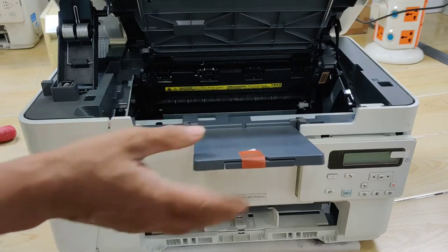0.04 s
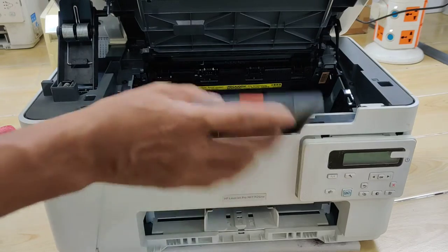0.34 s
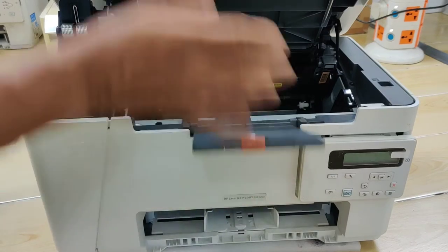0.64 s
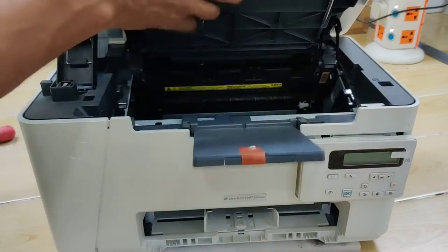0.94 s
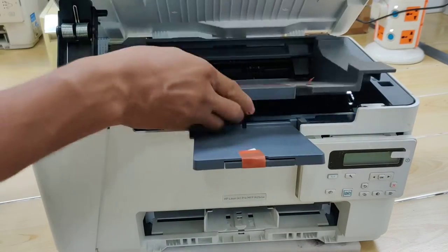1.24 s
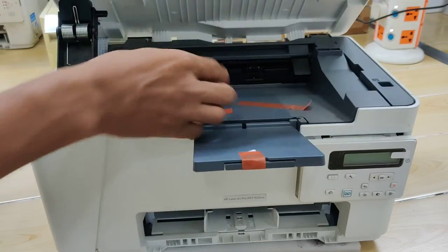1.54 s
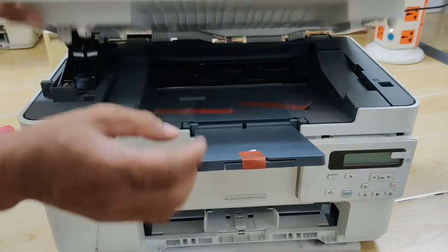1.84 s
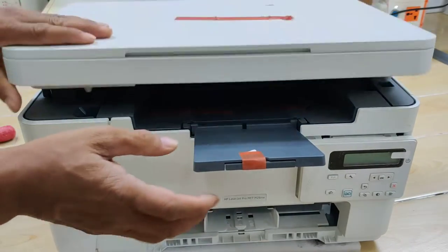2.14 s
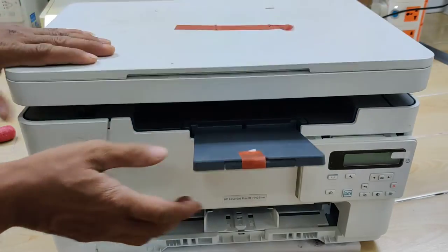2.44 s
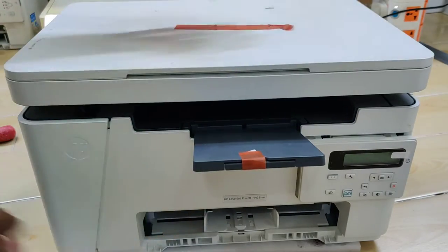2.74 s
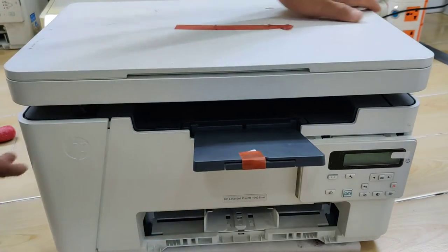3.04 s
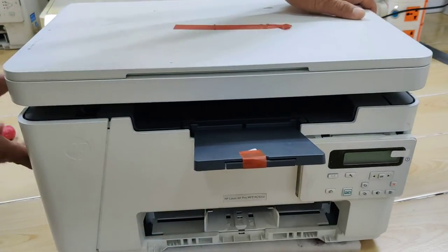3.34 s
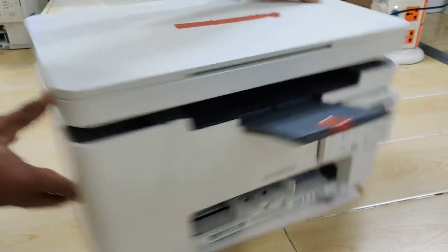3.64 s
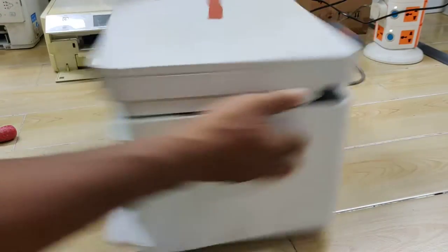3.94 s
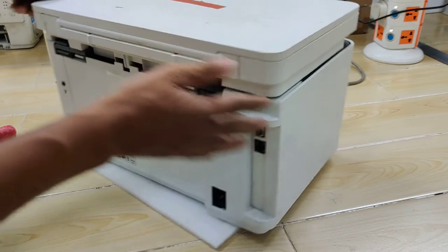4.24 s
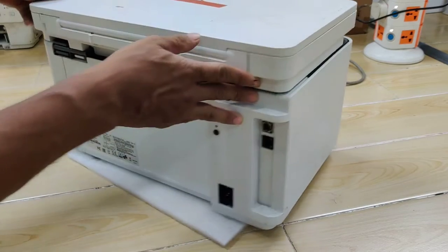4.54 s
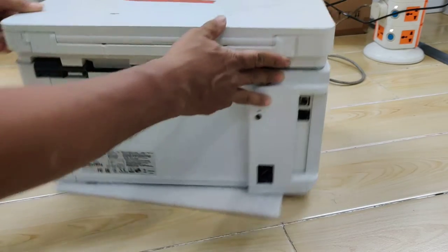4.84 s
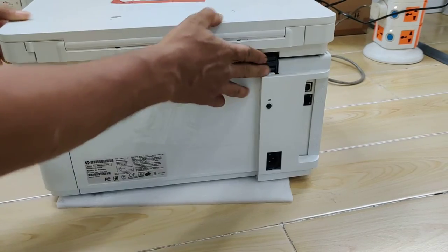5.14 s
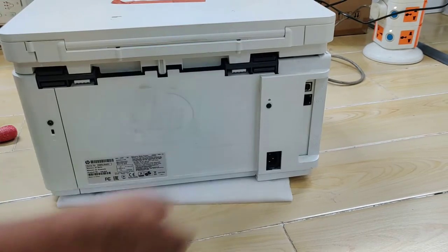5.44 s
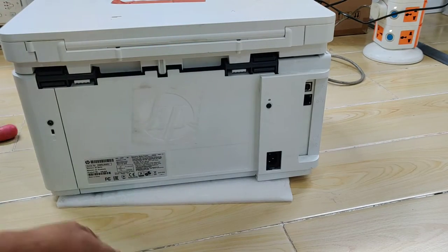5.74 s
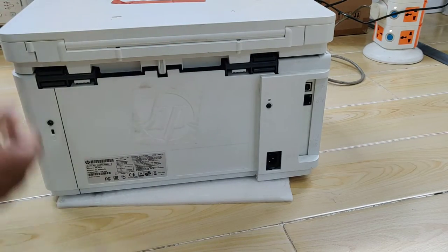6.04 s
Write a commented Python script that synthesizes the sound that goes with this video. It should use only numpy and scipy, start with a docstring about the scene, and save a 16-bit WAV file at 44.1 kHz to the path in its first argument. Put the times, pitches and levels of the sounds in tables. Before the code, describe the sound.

Close by in a small room, a desktop printer's plastic flap ticks and rattles. The inner cover snaps shut with a brief squeak and another sharp clack, and the heavy lid thuds down, ringing the hollow case. After a soft brush of a hand, the printer is dragged round on a foam mat in two rasping pushes, with a knock between them. A low hum runs underneath.

```python
"""Closing and turning a printer

A desktop printer on the floor of a small room, heard from close by. Its plastic flap ticks and rattles,
the inner cover squeaks and snaps shut, and the heavy scanner lid thuds down, ringing the hollow case.
Then it is dragged round on a foam mat in two pushes, with a knock between them, over a low hum.
The speed of each push sets the loudness of the rasp and the pitch of the zip as it brakes."""
import sys
import numpy as np
from scipy import signal
from scipy.fft import rfft, irfft, next_fast_len
from scipy.io import wavfile

SR = 44100
rng = np.random.default_rng(int(sys.argv[2]) if len(sys.argv) > 2 else 0)


def file_out(sig):
    """Save sig as 16-bit WAV at sys.argv[1]."""
    # one column per channel
    cols = np.atleast_2d(sig).T
    # limit, then scale
    lim = np.clip(cols, -1, 1)
    pcm = np.round(lim * 32767).astype(np.int16)
    wavfile.write(sys.argv[1], SR, pcm)


N = 277357
TIME = np.arange(N) / SR


def from_db(db):
    """Decibels to gain."""
    return 10 ** (np.asarray(db) / 20)


def unit_power(x):
    """Scale to an RMS of one."""
    return x / np.sqrt(np.mean(x ** 2) + 1e-20)


def at_hz(curve, hz, column=1):
    """Read a column of a curve on a log-frequency axis."""
    curve = np.array(curve)
    return np.interp(np.log(np.maximum(hz, 1)), np.log(curve[:, 0]), curve[:, column])


def equalise(x, curve):
    """Minimum-phase EQ along a (freq_hz, gain_db) curve: nothing sounds early."""
    size = 2 * next_fast_len(x.shape[-1] // 2 + 2048)
    gain = from_db(at_hz(curve, np.arange(size // 2 + 1) * SR / size))
    cepstrum = irfft(np.log(gain))
    cepstrum[1:size // 2] *= 2
    cepstrum[size // 2 + 1:] = 0
    return irfft(rfft(x, size) * np.exp(rfft(cepstrum)))[..., :x.shape[-1]]


def swell(start_s, end_s, attack_s, release_s):
    """Rounded attack, hold at 1, rounded release."""
    rise, fall = np.clip([(TIME - start_s) / attack_s, (end_s - TIME) / release_s], 0, 1)
    return np.sin(np.pi / 2 * rise) * np.sin(np.pi / 2 * fall)


def drift(rate_hz):
    """Smooth random wander of unit spread."""
    lowpass = signal.butter(2, rate_hz, fs=SR, output="sos")
    return unit_power(signal.sosfilt(lowpass, rng.standard_normal(N)))


def wavering_tone(hz, width_hz):
    """A narrow resonance stirred at random, of unit power."""
    phase = 2 * np.pi * hz * TIME
    return unit_power(drift(width_hz) * np.sin(phase) + drift(width_hz) * np.cos(phase))


def slip_tone(hz, partials, jitter, flutter_db, wander_hz):
    """A train of slips whose rate and strength waver, of about unit power."""
    phase = 2 * np.pi * np.cumsum(hz * (1 + jitter * drift(wander_hz))) / SR
    tone = sum(from_db(db) * np.sin(ratio * phase) for ratio, db in partials)
    power = sum(from_db(db) ** 2 for _, db in partials) / 2
    return tone / np.sqrt(power) * from_db(flutter_db * drift(wander_hz))


# Stereo width: freq_hz, side_minus_mid_db
STEREO_WIDTH = [(60, -33), (250, -11.5), (520, -9), (1000, -2), (2000, -1.5), (12000, 1)]
def noise(spectrum, size=N):
    """Stereo noise of unit power, centred in the bass and diffuse in the treble."""
    mid, side = rng.standard_normal((2, size))
    side = equalise(side, STEREO_WIDTH)
    return unit_power(equalise(np.array([mid + side, mid - side]), spectrum))


# Rise and fall of the room tone: time_s, level_db
ROOM_TONE_RIDE = [(0.0, -42.5), (0.37, -41.5), (0.73, -43), (0.93, -41), (1.14, -36), (1.44, -44),
                  (2.15, -41), (2.92, -50.5), (3.5, -53.5), (4.17, -44), (5.45, -52), (6.29, -52.5)]
# Soft room air and the rumble beneath it: freq_hz, density_db
AIR_SPECTRUM = [(100, -11), (240, 7.5), (320, 3), (560, 5), (1000, -2), (2000, -5.5), (3200, -10),
                (6500, -22), (15000, -22.5)]
LOW_AIR_SPECTRUM = [(20, -3), (45, 1.5), (62, -3.5), (82, -2), (112, 0.5), (150, -6), (230, -14),
                    (600, -50)]
def room_tone(hum_hz=100.2, whine_end_s=2.6, whine_fade_s=0.5):
    """Air, rumble and a wavering hum swell together, over a second hum and a thin whine that fades out."""
    ride_db = np.interp(TIME, *np.transpose(ROOM_TONE_RIDE))
    swing_db = ride_db - ride_db.mean()
    air = from_db(-47 + 0.61 * swing_db) * noise(AIR_SPECTRUM)
    rumble = from_db(-46 + 0.72 * swing_db) * noise(LOW_AIR_SPECTRUM)
    hum_phase = 2 * np.pi * np.cumsum(hum_hz * (1 + 0.029 * drift(rate_hz=9))) / SR
    flutter_db = 3 * drift(rate_hz=9.2)
    hum = from_db(-50.5 + 1.56 * swing_db + flutter_db) * unit_power(np.sin(hum_phase))
    upper_hum = from_db(-54) * wavering_tone(hz=121.6, width_hz=2.7)
    whine_fade = np.clip((whine_end_s - TIME) / whine_fade_s, 0, 1)
    whine = from_db(-68) * whine_fade * wavering_tone(hz=7000, width_hz=90)
    return air + rumble + hum + upper_hum + whine


# Small-room reverb: freq_hz, wet_db, t60_s
REVERB_BANDS = [(150, -8, 0.42), (600, -9.5, 0.4), (2400, -8, 0.48), (4870, -11.5, 0.62),
                (12000, -15.5, 0.23)]
def reverb(dry, predelay_s=0.011):
    """Diffuse reflections die away octave by octave."""
    size = SR * 3 // 4
    t, response = np.arange(size) / SR, 0
    white = noise([(100, 0), (10000, 0)], size)
    edges_hz = np.geomspace(70, 18000, 9)
    for low, high in zip(edges_hz, edges_hz[1:]):
        centre_hz = np.sqrt(low * high)
        decay = from_db(-60 * t / at_hz(REVERB_BANDS, centre_hz, column=2)) * (t > predelay_s)
        band = signal.sosfiltfilt(signal.butter(3, [low, high], "band", fs=SR, output="sos"), white)
        response += from_db(at_hz(REVERB_BANDS, centre_hz)) * band * decay / np.sqrt(np.sum(decay ** 2))
    return signal.fftconvolve(dry, response, axes=-1)[:, :N]


# Bright skin hiss and the hollow rumble of the rubbed case: freq_hz, density_db
SKIN_SPECTRUM = [(1000, -12), (4000, -6), (7000, -3), (15000, 1.5)]
CASE_RUMBLE_SPECTRUM = [(25, -1.5), (55, 7), (82, -24), (128, 1), (190, -10), (258, 2), (350, -8),
                        (700, -7), (1500, -17.5), (6000, -33)]
# Hand slides: start_s, end_s, hiss_db, murmur_db
HAND_SLIDES = [(.23, .55, -59.5, -49), (1.06, 1.27, -65, -43), (1.237, 1.345, -43, -33),
               (1.985, 2.236, -72, -42.5), (2.92, 3.062, -50.5, -56), (5.627, 5.7, -57, -74)]
def hands(attack_share=0.23):
    """Skin slides over the smooth casing, which murmurs under it."""
    skin, murmur, out = noise(SKIN_SPECTRUM), noise(CASE_RUMBLE_SPECTRUM), 0
    for start_s, end_s, hiss_db, murmur_db in HAND_SLIDES:
        attack_s = attack_share * (end_s - start_s)
        envelope = swell(start_s, end_s, attack_s, release_s=end_s - start_s - attack_s)
        out += envelope * (from_db(hiss_db) * skin + from_db(murmur_db) * murmur)
    return out


# Squeaks as the covers are pressed home and gripped: start_s, length_s, from_hz, to_hz, level_db
SQUEAK_CUES = [(0.987, 0.0231, 940, 713.6, -10), (1.254, 0.048, 883, 906, -30.5),
               (2.242, 0.023, 1466, 1390, -38), (3.315, 0.023, 1035, 1174, -41.5)]
# Timbre of a squeak: harmonic_number, level_db
SQUEAK_HARMONICS = [(1, -11), (2, -27.5), (3, -26.5), (4, -33)]
def cover_squeaks(edge_s=0.012, ring_s=0.08, ring_db=-11):
    """Plastic sticks and slips on plastic in a short glide, then the panel sings on at the last pitch."""
    out = 0
    for start_s, length_s, from_hz, to_hz, level_db in SQUEAK_CUES:
        end_s = start_s + length_s
        pitch_hz = np.interp(TIME, [start_s, end_s], [from_hz, to_hz])
        rubbing = swell(start_s, end_s, edge_s, edge_s)
        singing = from_db(ring_db) * swell(start_s, end_s + ring_s, length_s, ring_s)
        tone = slip_tone(pitch_hz, SQUEAK_HARMONICS, jitter=0.03995, flutter_db=1.5, wander_hz=185)
        out += from_db(level_db) * np.maximum(rubbing, singing) * tone
    return out


# Two shoves over the ribbed mat, each followed by a slow creep:
# start_s, stop_s, run_up_s, braking_s, top_rib_rate_hz, rasp_db, zip_db, rumble_db
MAT_PUSHES = [(3.353, 4.303, .62, .14, 3730, -33, -27.5, -49.5),
              (4.266, 4.46, 0.038, 0.094, 2100, -52, -45, -43),
              (4.422, 5.028, 0.48, .14, 4300, -34, -33, -46),
              (4.952, 5.35, 0.042, .33, 830, -62.5, -48.5, -46.5)]
def push_envelopes(zip_at_speed=0.66, zip_spread=0.16):
    """Push speed sets the ribs passed per second and the gains of rasp, hiss, zip and rumble."""
    rib_hz = rasp = hiss = zipping = rumble = 0
    for start_s, stop_s, run_up_s, braking_s, top_hz, rasp_db, zip_db, rumble_db in MAT_PUSHES:
        speed = swell(start_s, stop_s, run_up_s, braking_s)   # share of top speed
        rib_hz = np.maximum(rib_hz, top_hz * speed)
        friction = from_db(rasp_db) * speed ** 1.13
        rasp += friction
        hiss += from_db(5) * friction * speed ** 0.27   # gains on the rasp with speed
        # the ribs sing out as the braking case passes through one range of speed
        braking = (TIME > stop_s - braking_s) & (TIME < stop_s)
        zipping += from_db(zip_db) * braking * np.exp(-0.5 * ((speed - zip_at_speed) / zip_spread) ** 2)
        rumble = np.maximum(rumble, from_db(rumble_db) * speed ** 0.34)
    return rib_hz, rasp, hiss, zipping, rumble


# Rasp of the foam mat: freq_hz, density_db
FOAM_SPECTRUM = [(200, -13), (600, -7), (1100, -4.5), (2000, 1.5), (3100, 4), (4300, -2), (6500, -7.5),
                 (9000, -10), (15000, -10.5)]
def mat_drag(grain_db=0.55, tug_db=2.5, hiss_from_hz=5500):
    """Foam cells rasp under the weight, brighter with speed; the case judders and pushes end in a zip."""
    rib_hz, rasp_gain, hiss_gain, zip_gain, rumble_gain = push_envelopes()
    foam = noise(FOAM_SPECTRUM) * from_db(grain_db * drift(rate_hz=400))
    rasp = signal.sosfiltfilt(signal.butter(2, hiss_from_hz, fs=SR, output="sos"), foam)
    hiss = foam - rasp
    shudder = noise(CASE_RUMBLE_SPECTRUM) + from_db(-8) * wavering_tone(hz=134, width_hz=24)
    feet_catching = from_db(-41) * swell(start_s=3.86, end_s=4.08, attack_s=0.11, release_s=0.11)
    judder = np.maximum(rumble_gain, feet_catching) * from_db(tug_db * drift(rate_hz=25)) * shudder
    zip_partials = [(0.95, 0)]   # one tone, just under the rib rate
    ribs = [slip_tone(rib_hz, zip_partials, jitter=0.15, flutter_db=4, wander_hz=608) for _ in range(2)]
    return rasp_gain * rasp + hiss_gain * hiss + judder + zip_gain * np.array(ribs)


# Resonances of the hollow case: pitch_hz, level_db, t60_s
CASE_RESONANCES = [(77, -5, 0.091), (142, -15.5, 0.33), (222.3, -11, 0.19), (266.2, 4, 0.09),
                   (296.3, -15, 0.33), (379, -21.5, 0.18), (482, -20, 0.24), (546, -12, 0.21),
                   (597, -15.5, 0.22), (765, -6.5, 0.15), (905.5, -10.5, 0.2), (1094, -14, 0.17),
                   (1166, -4, 0.073), (1460, -18, 0.17), (2453, -17, 0.13), (2780, -13.5, 0.12),
                   (3100, -18.5, 0.1), (4810, -19, 0.085), (4850, -7, 0.05)]
def case_ring(t, spread_db=1.5, fill_cycles=0.91):
    """Each mode takes about a cycle to fill the case, then dies away; the balance varies by hit."""
    ring = np.zeros((2, len(t)))
    for pitch_hz, level_db, t60_s in CASE_RESONANCES:
        # short waves reach the two microphones out of step
        phase = rng.normal(0, 1, (2, 1)) * from_db(at_hz(STEREO_WIDTH, pitch_hz))
        attack = 1 - np.exp(-t * pitch_hz / fill_cycles)
        decay = from_db(level_db + spread_db * rng.normal() - 60 * t / t60_s)
        ring += attack * decay * np.sin(2 * np.pi * pitch_hz * t + phase)
    return ring


# Ticks, snaps and thuds of the plastic parts:
# start_s, level_db, bass_db, treble_db, t60_s, seat_delay_s, seat_relative_db
PLASTIC_HITS = [ (.099, -47, 9.5, 1, 0.11, .008, -5), (.255, -49.5, 10, 4, 0.064, 0.048, -3.5),
                (0.3527, -35, 0, -13, 0.048, 0.02, -4), (0.3742, -29, -1, 2, 0.092, 0.033, -17),
                (.585, -29, 1, 4, 0.054, 0.03, -6), (.707, -28.5, 3.5, -6, .065, 0.018, -3),
                (0.8034, -30, 2, -6.5, 0.068, .018, -2.5), (.880, -32, 3, -5, .05, 0.016, -3),
                (.9388, -13, -3, 0, 0.028, 0.0044, -2.5), (.959, -26, 5.5, 3, 0.066, .025, -4.5),
                (.989, -17.5, -3.5, 0.5, 0.08, .011, -5), (1.021, -25, 3.5, -30, 0.15, 0.034, -16),
                (1.052, -26.5, 5, -2, 0.043, .009, -8), (1.113, -36, 12.5, 0, .045, .005, -20),
                (1.187, -41, 12, -14, 0.095, 0.0088, -5.5), (1.323, -35, -11, -1.5, 0.033, 0.018, 4),
                (1.351, -15, 0.5, 0.5, 0.077, 0.0036, -1.5), (1.391, -23.5, -5.5, -5, .19, .067, -8),
                (1.737, -41.5, -17, -6.5, 0.092, 0.01, -8), (1.863, -38, -8, 3, 0.047, 0.0069, -11),
                (2.2481, -33.5, 12.5, -11.5, 0.082, .031, -4), (2.295, -32, 10, -5, .12, .016, 2),
                (2.3255, -21.5, -14, 4, 0.066, 0.03, -11), (2.327, -13, 8.5, -12.5, 0.079, 0.011, -7.5),
                (3.192, -58.5, 24.5, -18, .06, 0.0084, -6), (3.313, -38, 4.5, -7, 0.084, 0.046, -10.5),
                (3.856, -47.5, 16, -11, 0.094, 0.089, -2.5), (4.51, -32, -21, -16, 0.14, 0.0089, -5),
                (4.5244, -19.5, -6.5, 2, 0.068, .005, -7)]
def contacts():
    """A part strikes, then touches again as it seats: deeper, a little duller and with a longer clatter."""
    for start_s, level_db, bass_db, treble_db, t60_s, seat_delay_s, seat_db in PLASTIC_HITS:
        yield start_s, level_db, bass_db, treble_db, t60_s
        yield start_s + seat_delay_s, level_db + seat_db, bass_db + 1.5, treble_db - 0.5, t60_s * 1.87


# Clatter of the crowded panel modes: freq_hz, density_db
PANEL_SPECTRUM = [(40, -15), (80, -6), (150, -1), (255, 0), (380, 0.5), (650, 3), (1050, 1.5), (1600, 1),
                  (2700, 2.5), (4200, -4), (8000, -10.5), (15000, -14.5)]
def plastic_impacts(crack_db=9, clatter_db=6, ring_db=-2, spread_s=0.0012):
    """Each contact cracks, scatters through the panels and sets the case ringing."""
    size = SR // 2
    out, t = np.zeros((2, N + size)), np.arange(size) / SR
    attack = 1 - np.exp(-t / spread_s)   # the contact spreads through the panel
    crack = from_db(crack_db) * equalise(signal.unit_impulse(size), PANEL_SPECTRUM)
    for start_s, level_db, bass_db, treble_db, t60_s in contacts():
        clatter = from_db(clatter_db - 60 * t / t60_s) * attack * noise(PANEL_SPECTRUM, size)
        ring = from_db(ring_db) * attack * case_ring(t)
        # heavy parts bring out the bass, hard little latches the treble
        eq = [(70, 0.48 * bass_db), (280, bass_db), (1400, 0), (7000, treble_db), (14000, 1.46 * treble_db)]
        onset = round(start_s * SR)
        out[:, onset:onset + size] += from_db(level_db) * equalise(crack + clatter + ring, eq)
    return out[:, :N]


def scene():
    """The printer and the hands on it, with their reverb, over the room tone."""
    printer = plastic_impacts() + cover_squeaks() + mat_drag() + hands()
    return printer + reverb(printer) + room_tone()


# Stereo balance: freq_hz, left_minus_right_db
STEREO_BALANCE = [(100, 0.8), (260, 1), (900, 1), (2200, 1), (4400, 5), (7500, -5), (14000, 0.5)]
# Resonance of the microphone ports: freq_hz, gain_db
MIC_RESPONSE = [(3000, -1), (4150, -1), (4650, 6), (5100, 5.5), (6100, -4), (8000, -3.5), (12000, -9),
                (16000, -11)]
def record(dry, cutoff_hz=16200):
    """The microphone ports colour the sound, peaks are rounded and the top is cut."""
    left = equalise(dry[0], [(hz, db / 2) for hz, db in STEREO_BALANCE])
    right = equalise(dry[1], [(hz, -db / 2) for hz, db in STEREO_BALANCE])
    saturated = np.tanh(equalise(np.array([left, right]), MIC_RESPONSE))
    return signal.sosfilt(signal.ellip(10, 0.2, 80, cutoff_hz, fs=SR, output="sos"), saturated)


dry = scene()
out = record(dry)
file_out(out)
```